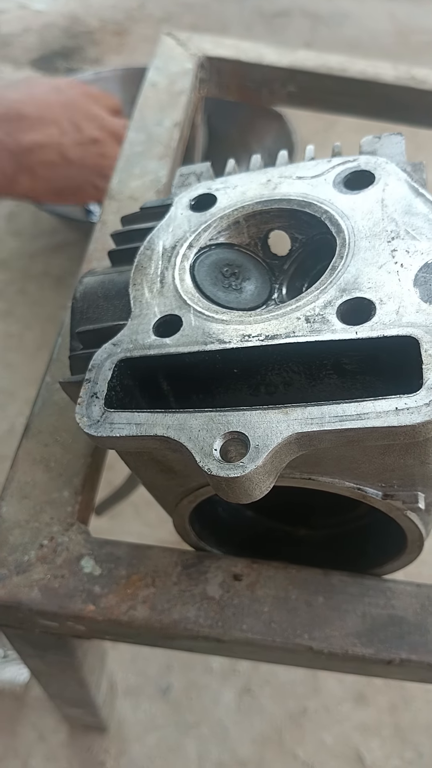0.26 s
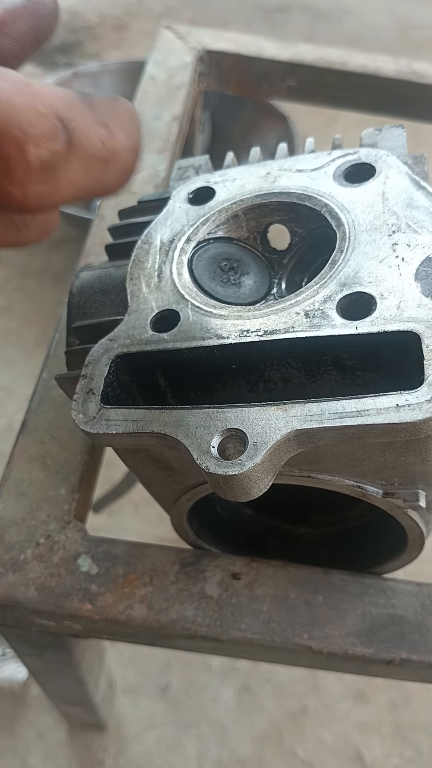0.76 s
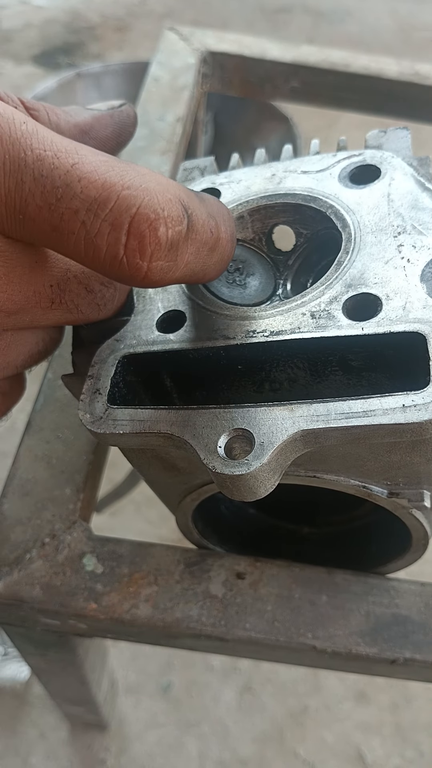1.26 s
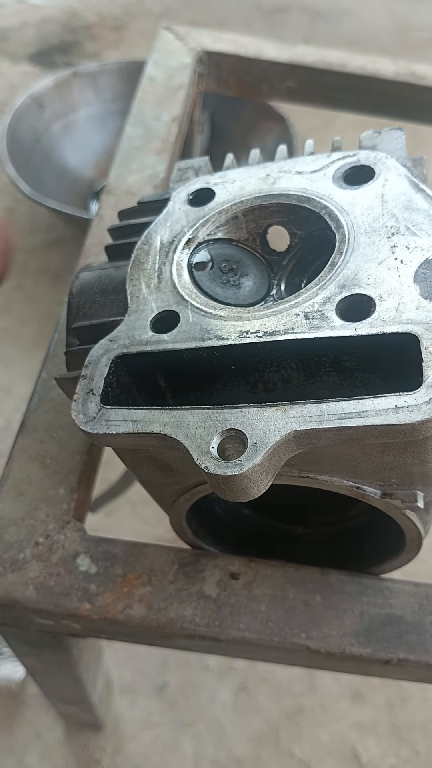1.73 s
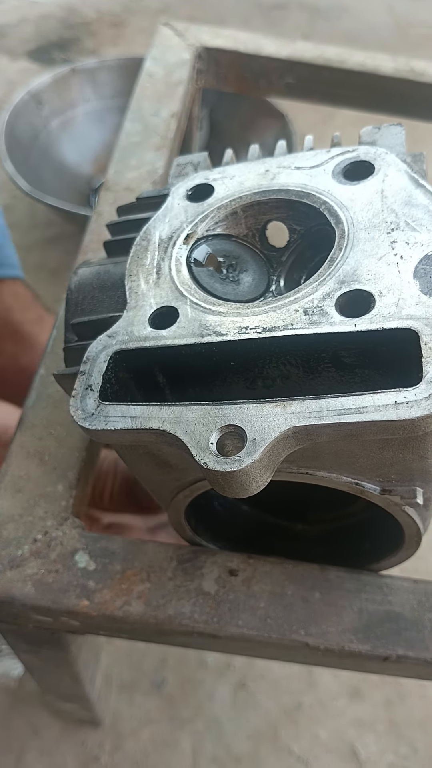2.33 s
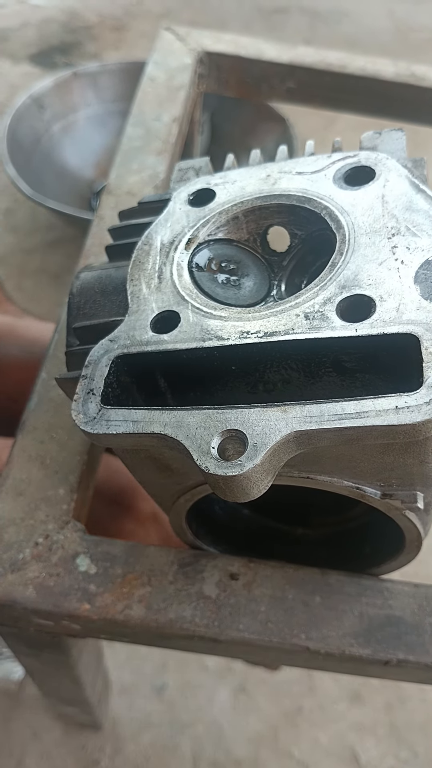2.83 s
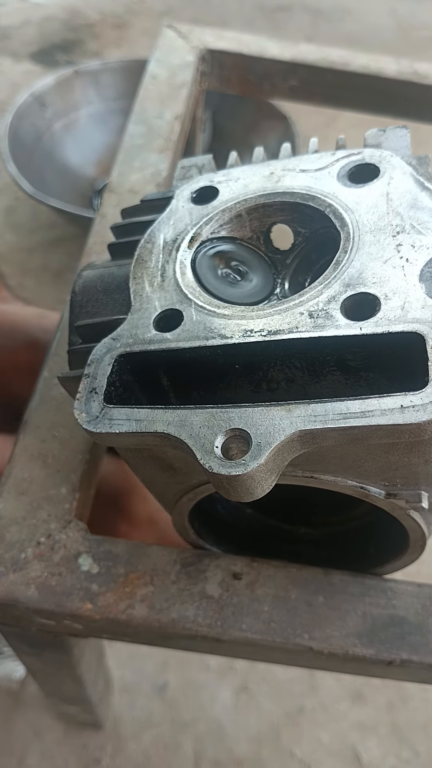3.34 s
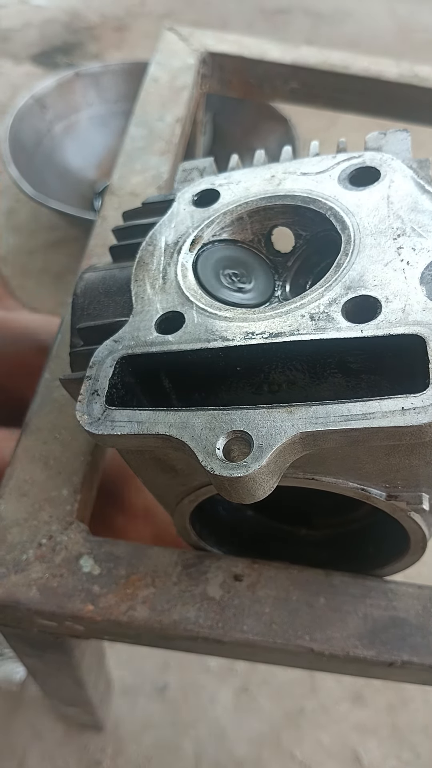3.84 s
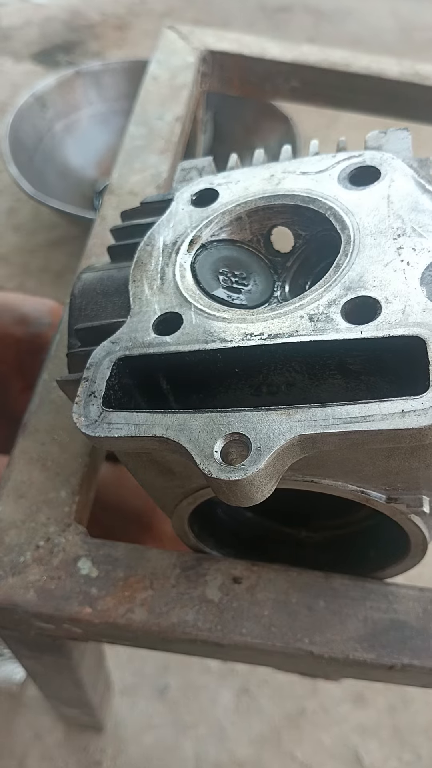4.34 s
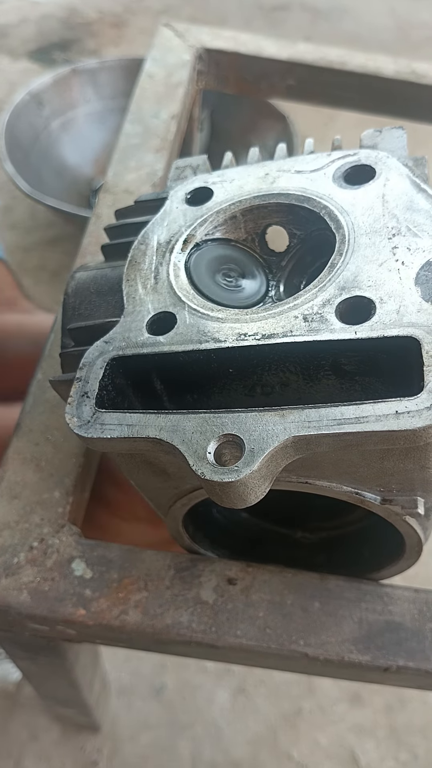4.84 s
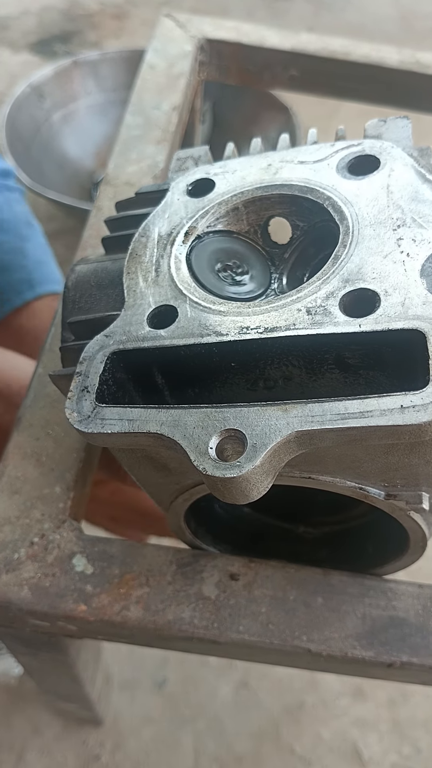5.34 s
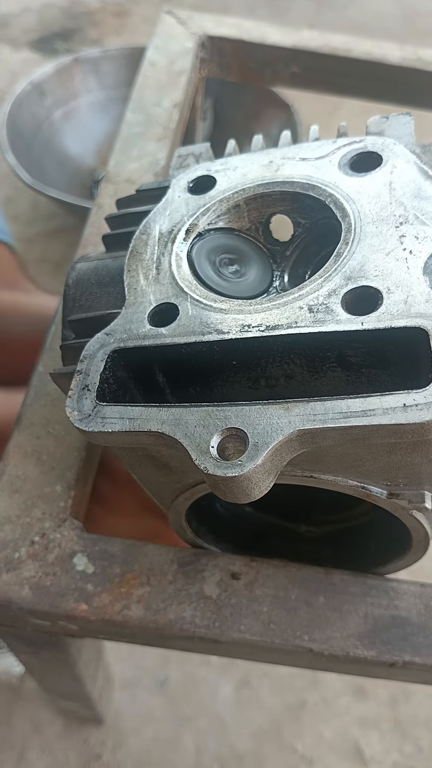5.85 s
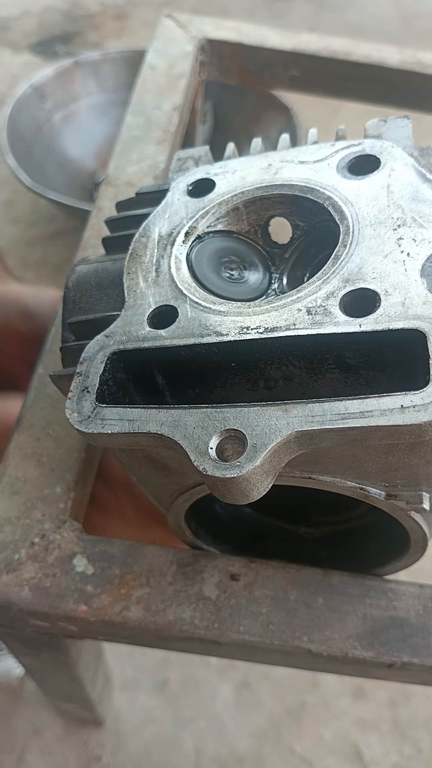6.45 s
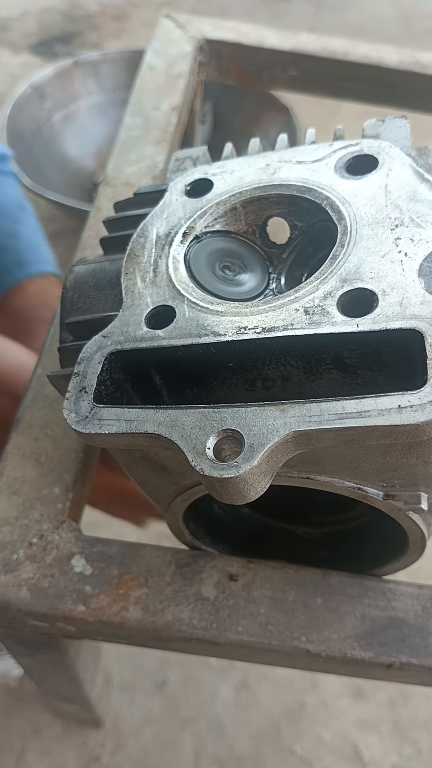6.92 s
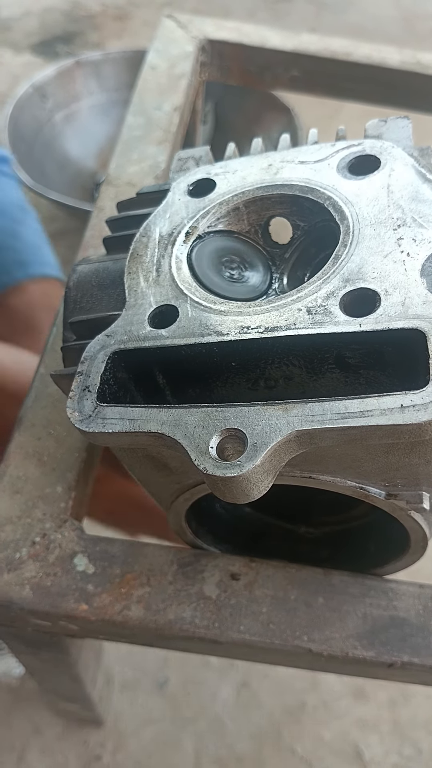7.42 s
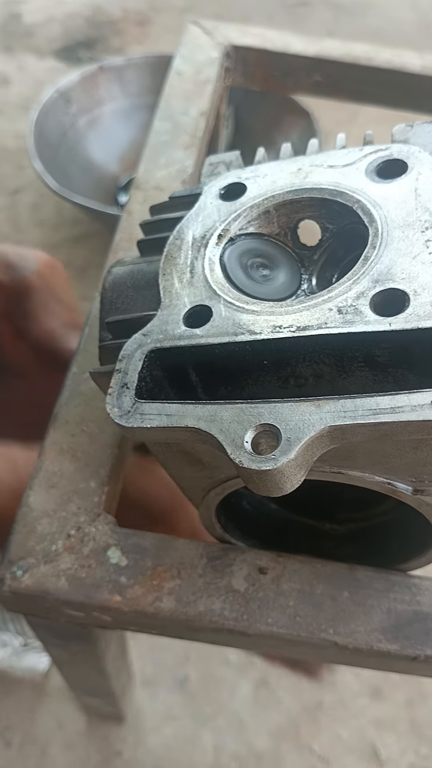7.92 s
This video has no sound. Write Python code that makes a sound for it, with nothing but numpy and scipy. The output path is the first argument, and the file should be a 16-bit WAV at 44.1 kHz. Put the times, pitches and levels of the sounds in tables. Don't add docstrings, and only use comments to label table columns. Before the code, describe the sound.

First only street sound: deep puttering exhaust, low hum, broad traffic rush and soft ground thuds, slowly fading. Then a small engine valve is twirled on its seat with abrasive paste: a few light separate rasps, then steady louder back-and-forth grinding, bright and crackly, ringing thinly around a high pitch. Heard close up in an open shed, with little echo.

```python
import sys
import numpy as np
from scipy import signal
from scipy.fft import rfft, irfft, next_fast_len
from scipy.io import wavfile
from scipy.ndimage import uniform_filter1d

SR = 44100
rng = np.random.default_rng(int(sys.argv[2]) if len(sys.argv) > 2 else 0)


def gain_from_decibels(decibels):
    exponent = np.asarray(decibels, float) / 20
    return 10 ** exponent


def store_pcm(level_fs):
    pcm = np.round(np.clip(level_fs, -1, 1) * 32767).astype(np.int16)
    wavfile.write(sys.argv[1], SR, np.atleast_2d(pcm).T)


N = 360738
FAST = next_fast_len(N + SR)
FREQ = np.fft.rfftfreq(FAST, 1 / SR)

# time in seconds, firing rate in Hz, engine level in dB, traffic level in dB.
STREET = [(0.0, 32.62, -23, -32.5), (.5, 32.57, -22, -32.5), (1.2, 32.28, -24, -32.5),
          (1.9, 32.46, -26.5, -32), (2.6, 32.98, -29, -35), (3.2, 33.25, -32.5, -39),
          (4.0, 34.24, -36.5, -41.5), (5.3, 34.02, -38.5, -45.5), (6.4, 34.22, -41, -49),
          (8.18, 35.04, -42.5, -49.5)]
# multiple of the firing rate, level in dB over the rumble.
LOW_ORDERS = [(4, -7.5), (5, -8), (6, -13.5)]
# start in seconds, end in seconds, level in dB.
LOW_SWELLS = [
    [(-.05, .32, -30.5), (.55, 1.35, -24), (1.55, 2.05, -45.5), (2.3, 3.0, -48), (3.25, 3.7, -45)],
    [(-.1, .3, -20), (.38, 1.15, -22), (1.2, 1.8, -28.5), (2.03, 2.95, -33.5), (3.25, 3.9, -41)],
    [(-.3, .12, -30), (.3, .97, -18), (1.0, 1.9, -29)],
]
# multiple of the firing rate, level in dB over the rumble.
UPPER_ORDERS = [(2, -24), (7, -17), (8, -14), (9, -17), (10, -17), (11, -17), (12, -20), (13, -19),
                (14, -21)]
# start in seconds, end in seconds, multiple, level in dB.
UPPER_SWELLS = [
    (.2, 1.7, 9, -29),
    (-.2, .65, 10, -29),
    (0., .55, 11, -32),
    (.85, 1.4, 11, -32),
    (2.6, 3.5, 8, -40),
    (2.7, 3.7, 15.2, -45),
]
# time in seconds, level in dB.
HUM = [(0.0, -30), (0.09, -51), (0.16, -27), (0.48, -27.5), (1.8, -36.5), (2.71, -32), (2.8, -39.5),
       (3.23, -25), (3.74, -36.5), (4.94, -42), (5.85, -35.5), (6.31, -54.5), (7.24, -39), (7.36, -48.5),
       (8.02, -43), (8.18, -47)]
# frequency in Hz, level in dB per Hz.
RUMBLE_COLOUR = [(60, -41), (85, -32), (100, -6), (160, -1), (270, -3.5), (450, -12.5), (600, -30)]
ROAR_COLOUR = [(240, 2.5), (400, -7), (613, -5.5), (762, -3.5), (1440, -3.5), (1740, -10.5), (2400, -20.5),
               (3120, -46), (5280, -120)]
HISS_COLOUR = [(1290, -5.5), (2200, -3), (2410, -5.5), (3020, -6), (3240, -8.5), (4880, -12.5),
               (6390, -16.5), (9200, -27.5), (10200, -41), (15000, -56), (22000, -120)]
THUD_COLOUR = [(25, -25), (50, -15.5), (65, -11), (85, -3), (110, -14)]
# time in seconds, level in dB.
GROUND = [(0.0, -48), (0.57, -40), (0.66, -54), (1.18, -40), (1.98, -48), (2.03, -37), (2.28, -48.5),
          (4.9, -56), (5.15, -72), (5.24, -53), (6.49, -71), (6.58, -52), (8.07, -66), (8.18, -56)]
# start in seconds, end in seconds, pitch in Hz, width in Hz, level in dB.
BUZZ = [
    (-.2, .5, 1410, 25, -41),
    (.85, 1.3, 1410, 20, -41),
    (-.3, 1.3, 8590, 140, -57),
    (6.86, 6.95, 1300, 1800, -37),
    (1.2, 2.3, 1380, 250, -39),
    (-.2, .45, 10562, 30, -75),
    (2.6, 3.7, 4097, 60, -54),
    (-1.5, 2.4, 13800, 3000, -64),
]
# time in seconds, pitch in Hz, level in dB.
FAR_ENGINE = [(6.5, 141.3, -47), (6.696, 138.2, -45), (6.952, 124.2, -41.5), (7.214, 145, -45),
              (7.632, 142.8, -49), (7.682, 144.3, -41), (7.8, 132, -61), (8.016, 154.8, -42),
              (8.18, 150, -39)]

# start in seconds, length in seconds,
# fastest moment as a share of the length, grit level in dB, casting level in dB.
PUSHES = [(3.355, .17, 0.47, -35.5, -27.5), (3.662, 0.14, 0.12, -34, -26.5),
          (3.885, 0.18, 0.53, -32, -24.5), (4.122, 0.18, 0.36, -29, -23), (4.318, 0.15, 0.76, -30, -27.5),
          (4.537, 0.17, 0.2, -22, -24), (4.939, 0.19, 0.25, -20.5, -22), (5.338, 0.19, .35, -20, -22),
          (5.73, 0.25, 0.25, -19, -26), (6.138, .19, 0.31, -20, -23), (6.54, 0.22, 0.29, -20, -22.5),
          (6.955, 0.23, 0.23, -21, -29), (7.337, 0.22, 0.23, -21, -25.5), (7.747, .2, 0.32, -21.5, -26),
          (8.141, 0.22, 0.12, -24.5, -22.5)]
# start in seconds, length in seconds,
# fastest moment as a share of the length, grit level in dB, casting level in dB.
PULLS = [(4.727, 0.19, 0.46, -27.5, -22), (5.111, 0.22, .35, -23, -23), (5.516, 0.22, 0.39, -24, -23),
         (5.92, 0.19, 0.5, -21.5, -23), (6.325, .2, 0.44, -22, -21.5), (6.74, 0.18, 0.35, -24.5, -28.5),
         (7.155, 0.2, 0.39, -23, -23), (7.54, 0.22, 0.38, -23, -24.5), (7.95, 0.18, 0.49, -21.5, -27)]
# time in seconds, sizzle in dB over the grit, seat and scrape in dB over the grit.
FINENESS = [(3.3, -17, 4.5), (4.3, -19.5, 1.5), (4.6, -16, 2), (5.4, -16.5, -2.5), (8.18, -14.5, -4)]
# time in seconds, level in dB, hold in seconds, fade in dB per second.
SINGS = [(3.372, -29, 0.12, 600), (3.68, -38, 0.065, 300), (3.91, -26, 0.086, 450),
         (4.153, -20, 0.0083, 300), (4.367, -21, .015, 300), (4.559, -13.5, 0.0073, 400),
         (4.589, -14.5, .015, 300), (4.628, -18, .01, 167), (4.768, -24, 0.016, 200),
         (4.821, -21, 0.017, 300), (4.96, -14.5, 0.016, 300), (5.039, -19.5, .008, 350),
         (5.168, -15, 0.013, 250), (5.225, -21, .03, 350), (5.351, -22, 0.09, 352),
         (5.63, -24.5, 0.047, 250), (5.794, -14.5, 0.0058, 218), (5.988, -24.5, 0.047, 350),
         (6.192, -16.5, 0.045, 180), (6.423, -25, .015, 300), (6.608, -15, 0.037, 267),
         (6.802, -17, 0.016, 450), (7.008, -18, 0.055, 200), (7.22, -17, 0.061, 797),
         (7.35, -25.5, 0.026, 207), (7.621, -15, 0.028, 300), (7.838, -21.5, 0.079, 160),
         (8.032, -23.5, .01, 300), (8.052, -19.5, 0.014, 260), (8.17, -21.5, .01, 200)]
# pitches in Hz, then levels in dB.
BODY_HZ = [1084, 1421, 1505, 1545, 1590, 1663, 1810, 2088, 2153]
BODY_DB = [-9.5, 0.5, -5, -6, 2.5, 2, 4.5, -1, -7.5]
# pitches in Hz, then levels in dB.
SEAT_HZ = [3000, 3289, 3340, 3531, 3785, 4092]
SEAT_DB = [2.5, 1.5, -2.5, -20, -4.5, 5]
# pitches in Hz, then levels in dB.
FINS_HZ = [5300, 5420, 5640, 5775, 5990, 6152, 6488, 6750, 6950, 7207, 7470, 8250, 8680, 8870, 9080]
FINS_DB = [-4.5, -2.5, -9, 2, -1, -4.5, 1, -6, -9.5, -4.5, -8.5, -11.5, -13, -20, -9]
# pitches in Hz, then levels in dB.
SIZZLE_HZ = [9840, 10500, 11900, 12400, 13000, 13150, 13700, 13900, 14500, 14800, 15300, 15700]
SIZZLE_DB = [-9, 1.5, -22, 2, -3, -9, -2, -4, -9, -4, 1, -10]
# frequency in Hz, level in dB per Hz.
SCRAPE_COLOUR = [(700, -11), (1000, -8.5), (1700, -2.5), (2500, -7), (3500, -2), (4300, 3.5), (4900, -8),
                 (6000, -8.5), (7700, -13.5), (9000, -8), (10000, -37.5), (11000, -47)]
SIZZLE_COLOUR = [(8500, -18), (9600, -3.5), (11600, -12), (12700, -12), (14500, -6), (15800, -3)]
# width in Hz, share of its beating that is evened out from 0 to 1.
RING = (12, .8)

RING_HZ = 4488
RING_OVER_GRIT_DB, SING_RISE_DB_S = -3, 602
# dB under the peak at start, at end, bend of the rise, bend of the fall
PUSH_SHAPE, PULL_SHAPE = (3.3, 31, 1.67, 1.67), (19, 31.6, 1.92, 1.51)
# share of the grit's dB swing, shift of its peak as a share of the length
PUSH_BODY, PULL_BODY = (0.68, -0.022), (1, 0.22)
JERK_S, JERK_DB, JERK_LEAD_S = 0.011, 53, 0.0065
KNOCK_DB, KNOCK_S = 8.5, 0.0075
SIZZLE_SWING, SIZZLE_SQUARE = 1.8, 1.08
PULL_SIZZLE_DB, SIZZLE_FLICKER_DB = -1, 1
RASP_DB = 2.16
HISS_DB, HISS_SLOPE, HISS_FLOOR_DB = -35, 3.3, -48
CLATTER_UNDER_DB = -19.5


def set_level(x, db):
    return x * gain_from_decibels(db) / np.sqrt(np.mean(x ** 2))


def columns(rows):
    s, *cols = np.transpose(rows)
    return [np.interp(np.arange(N) / SR, s, c) for c in cols]


def walk(rate):
    k = int(SR / rate)
    held = np.repeat(rng.standard_normal(N // k + 1), k)
    return 1.3 * uniform_filter1d(uniform_filter1d(held, k), k)[:N]


def bump(start, end):
    progress = np.clip((np.arange(N) / SR - start) / (end - start), 0, 1)
    return np.sin(np.pi * progress) ** .6


def tone(hz):
    return np.sqrt(2) * np.sin(2 * np.pi * np.cumsum(hz) / SR)


def shape(points):
    hz, db = np.transpose(points)
    return gain_from_decibels(np.interp(np.log(FREQ + 1), np.log(hz), db, left=-90, right=-90))


def through(x, response):
    return irfft(rfft(x, FAST) * response, FAST)[:N]


def colour(x, points):
    return through(x, shape(points))


def unit(response, db):
    return gain_from_decibels(db) * response / np.sqrt(np.mean(np.abs(response) ** 2))


def mode(x, hz, width):
    pole = np.exp(np.pi * (2j * hz - max(width, 1)) / SR)
    return signal.lfilter([1 - abs(pole)], [1, -pole], x)


def engine(hz, rumble_db):
    uneven = 1 + .002 * walk(10)
    phase = 2 * np.pi * np.cumsum(uniform_filter1d(hz, size=15000) * uneven) / SR

    def order(k):
        return np.sqrt(2) * np.sin(k * phase + k ** 2 / 3)

    out = np.zeros(N)
    for (k, db), swells in zip(LOW_ORDERS, LOW_SWELLS):
        lift = sum(gain_from_decibels(top_db) * bump(start, end) for start, end, top_db in swells)
        out += (gain_from_decibels(rumble_db + db) + lift) * gain_from_decibels(1.74 * walk(20)) * order(k)
    for k, db in UPPER_ORDERS:
        out += gain_from_decibels(rumble_db + db + 3 * walk(6)) * order(k)
    for start, end, k, db in UPPER_SWELLS:
        out += gain_from_decibels(db + 2.1 * walk(8.17)) * bump(start, end) * order(k)
    return out, phase


def motor_hum():
    return gain_from_decibels(columns(HUM)[0]) * tone(101.8 + .6 * walk(3))


def traffic():
    out = np.zeros(N)
    for start, end, hz, width, db in BUZZ:
        buzz = mode(rng.standard_normal(N), hz, width).imag
        out += bump(start, end) * set_level(buzz, db)
    hz, db = columns([(6.4, 151.2, -89)] + FAR_ENGINE)
    return out + gain_from_decibels(db) * tone(hz)


def street():
    hz, rumble_db, roar_db = columns(STREET)
    exhaust, phase = engine(hz, rumble_db)
    near_hiss = gain_from_decibels(HISS_DB + HISS_SLOPE * (roar_db - roar_db.max()))
    far_hiss = gain_from_decibels(HISS_FLOOR_DB) + gain_from_decibels(rumble_db + CLATTER_UNDER_DB)
    throb = 1 + 0.032 * np.cos(phase)
    noise = rng.standard_normal((4, N))
    rumble = gain_from_decibels(rumble_db + 0.54 * walk(8)) * set_level(colour(noise[0], RUMBLE_COLOUR), .1)
    roar = gain_from_decibels(roar_db + 0.28 * walk(6.7)) * throb * set_level(colour(noise[1], ROAR_COLOUR), 5.53)
    hiss = np.hypot(near_hiss, far_hiss) * gain_from_decibels(.5 * walk(6.96))
    hiss = hiss * set_level(colour(noise[2], HISS_COLOUR), 2.9)
    thud = gain_from_decibels(columns(GROUND)[0] + 1.5) * set_level(colour(noise[3], THUD_COLOUR), -0.55)
    return exhaust + motor_hum() + rumble + roar + hiss + thud + traffic()


def twirls(rows, form, swing=1., shift=0., jerk_db=0., column=3, square=1., knock_db=0.):
    t = np.arange(0, N, 32)[:, None] / SR
    start, length, top = np.transpose(rows)[:3]
    rise_db, fall_db, rise_bend, fall_bend = form
    progress = (t - start) / length
    top = np.clip(top + shift, .05, .9)
    before = np.clip(1 - progress / top, 0, None)
    after = np.clip((progress - top) / (1 - top), 0, None)
    under = rise_db * before ** (rise_bend * square) + fall_db * after ** (fall_bend * square)
    under = swing * under + jerk_db * np.clip(1 - (t - start + JERK_LEAD_S) / JERK_S, 0, None)
    under -= knock_db * np.exp(-np.clip(t - start, 0, None) / KNOCK_S)
    return (np.transpose(rows)[column] - under).max(axis=1)


def hands():
    t = np.arange(0, N, 32)[:, None] / SR

    def both(swing, square=1., pull_db=0.):
        push = twirls(PUSHES, PUSH_SHAPE, swing, jerk_db=JERK_DB, square=square)
        pull = twirls(PULLS, PULL_SHAPE, swing, square=square)
        return np.maximum(push, pull + pull_db)

    def full(db):
        return np.interp(np.arange(N) / SR, t[:, 0], np.maximum(db, -100))

    push_body = twirls(PUSHES, PUSH_SHAPE, *PUSH_BODY, JERK_DB, column=4, knock_db=KNOCK_DB)
    pull_body = twirls(PULLS, PULL_SHAPE, *PULL_BODY, column=4)
    body = np.maximum(push_body, pull_body)
    at, db, hold, fade = np.transpose(SINGS)
    rising = SING_RISE_DB_S * np.clip(at - t, 0, None)
    fading = fade * np.clip(t - at - hold, 0, None)
    song = (db - rising - fading).max(axis=1)
    ring = np.maximum(both(1.0) + RING_OVER_GRIT_DB, song)
    sizzle = both(SIZZLE_SWING, SIZZLE_SQUARE, PULL_SIZZLE_DB)
    return full(both(0.95)), full(ring), full(body), full(sizzle)


def grit(per_s, spread_db, patchy_db):
    crushed = rng.random(N) < per_s / SR
    size = gain_from_decibels(spread_db * rng.exponential(size=N)) * rng.standard_normal(N)
    return set_level(crushed * size * gain_from_decibels(patchy_db * walk(90)), 0)


def modes(freqs, levels_db):
    out = 0
    for k, (hz, db) in enumerate(zip(freqs, levels_db)):
        width = 14 + hz / 400
        resonance = 1j * FREQ * width / (hz ** 2 - FREQ ** 2 + 1j * FREQ * width)
        out = out + (-1) ** k * gain_from_decibels(db) * resonance
    return out


def shaken(force, freqs, levels_db, db, sway_db, rate):
    parts = [modes(freqs[k::3], levels_db[k::3]) for k in range(3)]
    scale = gain_from_decibels(db) / np.sqrt(np.mean(np.abs(sum(parts)) ** 2))
    share = gain_from_decibels(sway_db * np.array([walk(rate) for _ in parts]))
    share /= np.sqrt(np.mean(share ** 2, axis=0))
    return sum(through(force * s, scale * part) for s, part in zip(share, parts))


def valve_ring(force, ring_db):
    width, even = RING
    pointer = mode(mode(force, RING_HZ, 90), RING_HZ, width)
    pointer /= np.sqrt(uniform_filter1d(np.abs(pointer) ** 2, size=2500) + 1e-14)
    ring = (pointer / (np.abs(pointer) ** 2 + .15) ** (even / 2)).imag
    return gain_from_decibels(ring_db + 2.5 * walk(40)) * set_level(ring, .2)


def room(x, t60_s, wet_db):
    t = np.arange(SR // 2) / SR
    tail = rng.standard_normal(len(t)) * gain_from_decibels(-60 * t / t60_s) * (t > .004)
    tail = signal.sosfilt(signal.butter(2, 6000, fs=SR, output="sos"), tail)
    tail /= np.sqrt(np.sum(tail ** 2))
    return x + gain_from_decibels(wet_db) * signal.fftconvolve(x, tail)[:N]


def lapping():
    grit_db, ring_db, body_db, sizzle_db = hands()
    fine_db, coarse_db = columns(FINENESS)
    sizzle_db = sizzle_db + fine_db + SIZZLE_FLICKER_DB * walk(35)
    coarse_db = grit_db + coarse_db + RASP_DB * walk(28)
    seat = grit(per_s=9000, spread_db=1.3, patchy_db=1.4)
    face = grit(per_s=9000, spread_db=1.3, patchy_db=1.4)
    fins = shaken(seat * gain_from_decibels(grit_db), FINS_HZ, FINS_DB, -2.2, sway_db=4.0, rate=14)
    seat_ring = shaken(seat * gain_from_decibels(coarse_db), SEAT_HZ, SEAT_DB, -8.5, sway_db=3, rate=16)
    body = shaken(seat * gain_from_decibels(body_db), BODY_HZ, BODY_DB, -1.73, sway_db=4.0, rate=22)
    scrape = through(face * gain_from_decibels(coarse_db), unit(shape(SCRAPE_COLOUR), -1.89))
    sizzle = through(seat * gain_from_decibels(sizzle_db), unit(modes(SIZZLE_HZ, SIZZLE_DB), -5))
    sizzle += through(face * gain_from_decibels(sizzle_db), unit(shape(SIZZLE_COLOUR), -2.5))
    shed = room(fins + seat_ring + scrape + sizzle + body, t60_s=0.25, wet_db=-13)
    return shed + valve_ring(face * gain_from_decibels(grit_db), ring_db)


def scene():
    return (lapping() + street())[None]


def squelch(x, band, under_db, depth_db):
    part = colour(x, band)
    part_power = uniform_filter1d(part ** 2, size=1800)
    whole_power = uniform_filter1d(x ** 2, size=1800)
    ratio_db = 10 * np.log10(part_power / (whole_power + 1e-12) + 1e-12)
    shut = uniform_filter1d(np.clip((-under_db - ratio_db) / 3, 0, 1), size=500)
    return x - part * shut * (1 - gain_from_decibels(-depth_db))


def band_limit(x):
    return signal.sosfilt(signal.butter(12, 15910, fs=SR, output="sos"), x)


def record(dry):
    x = squelch(dry[0], [(380, -30), (430, 0), (760, 0), (860, -30)], under_db=31, depth_db=20)
    ceiling = 1.1
    x = ceiling * np.tanh(x / ceiling)
    x = colour(x, [(20, -8), (45, 0), (15750, 0), (15900, -60)])
    return band_limit(x[None])


dry = scene()
out = record(dry)
store_pcm(out)
```